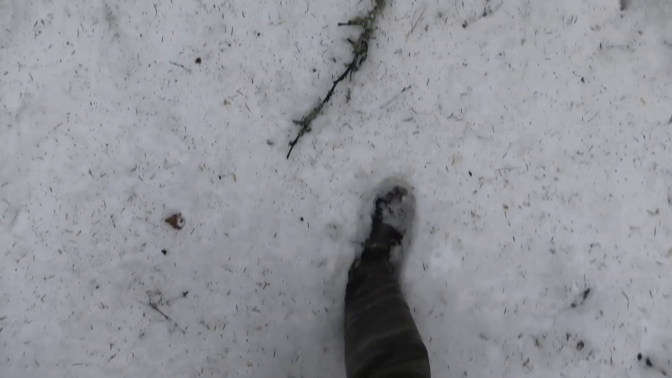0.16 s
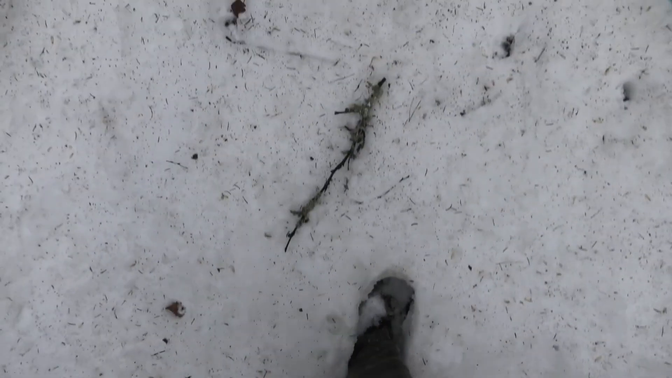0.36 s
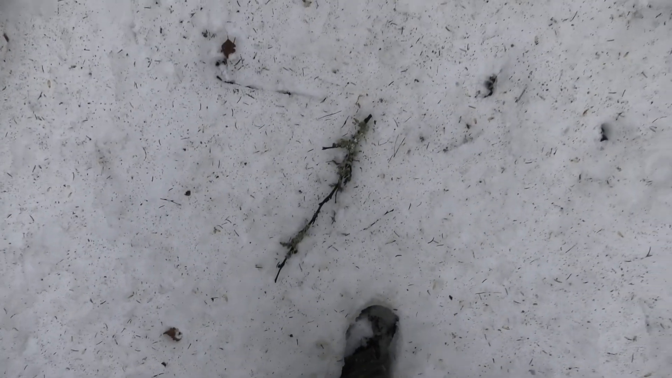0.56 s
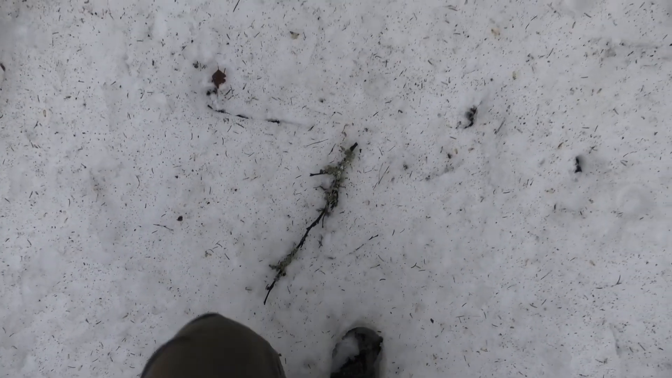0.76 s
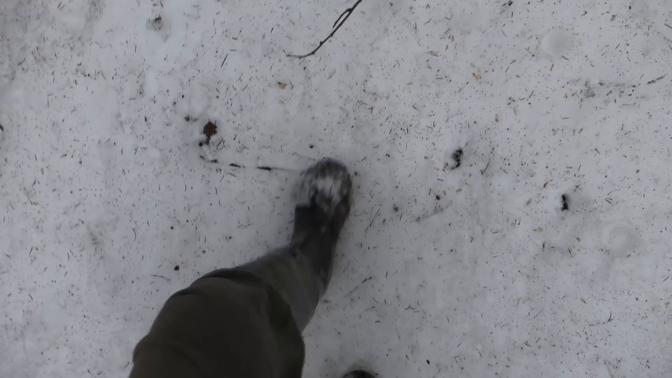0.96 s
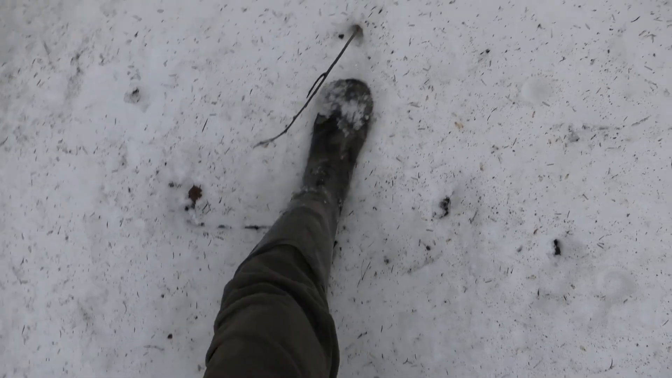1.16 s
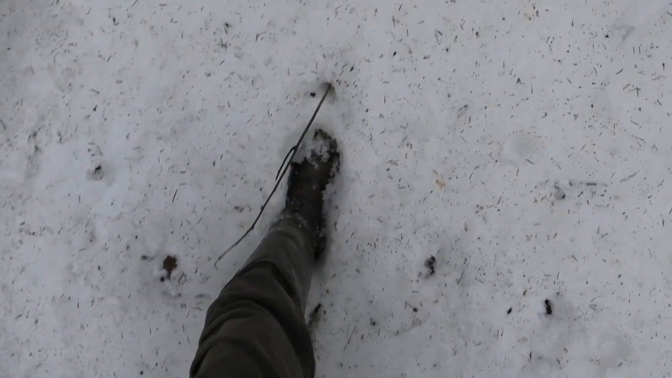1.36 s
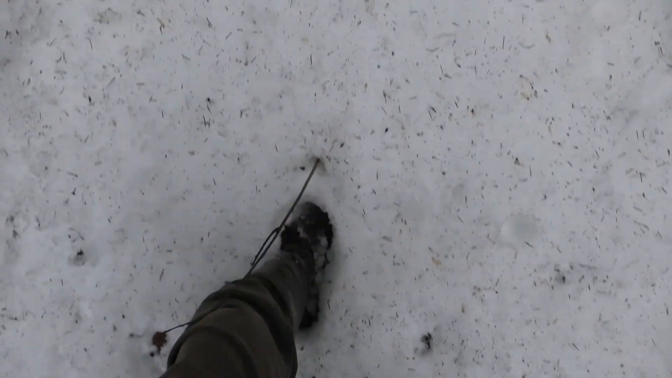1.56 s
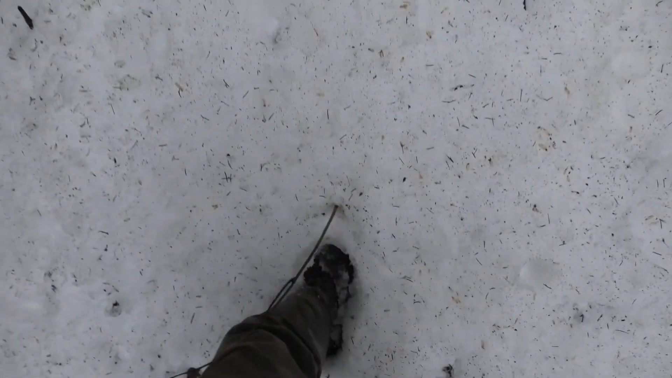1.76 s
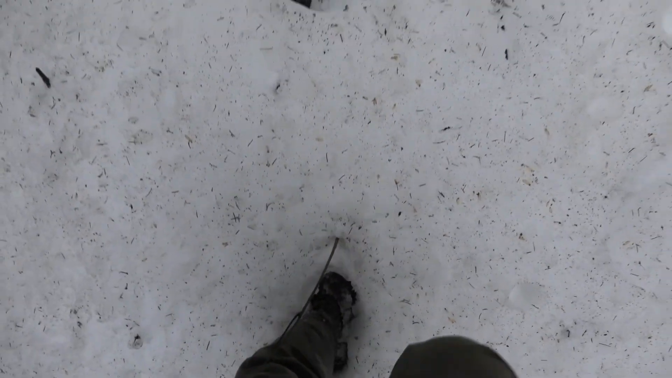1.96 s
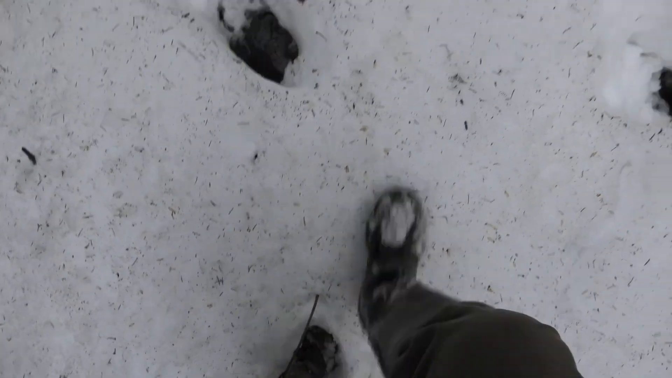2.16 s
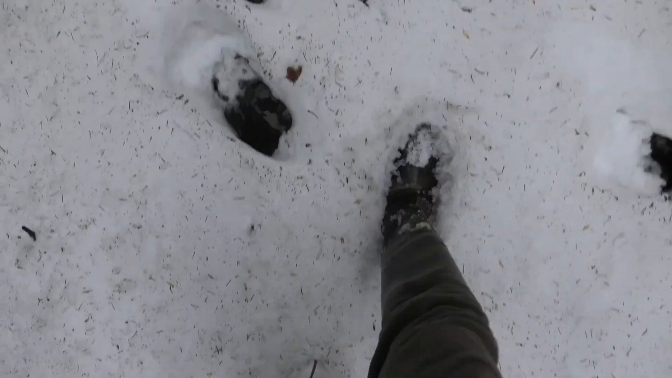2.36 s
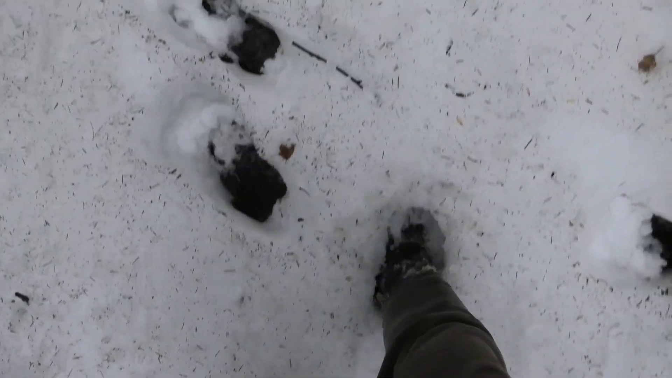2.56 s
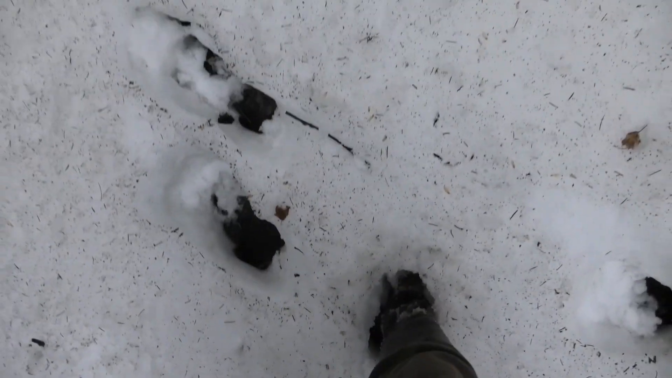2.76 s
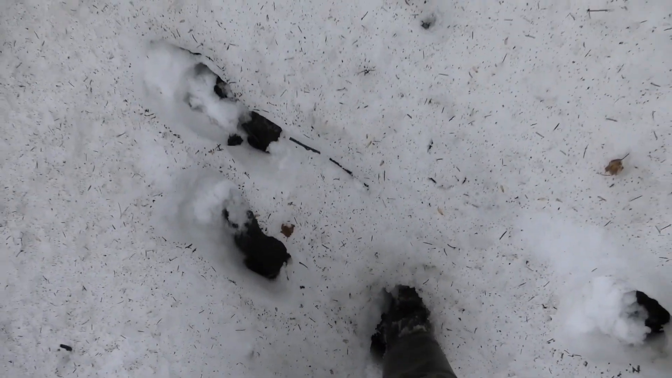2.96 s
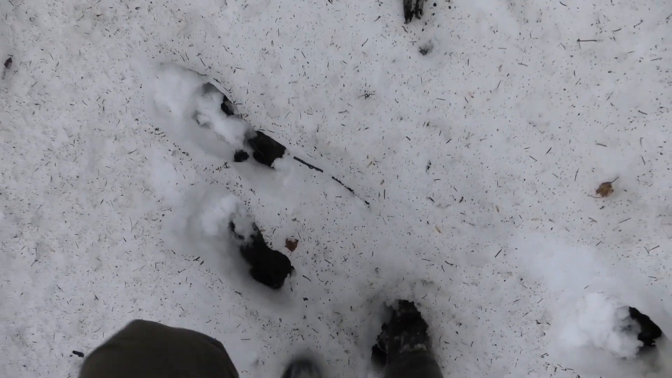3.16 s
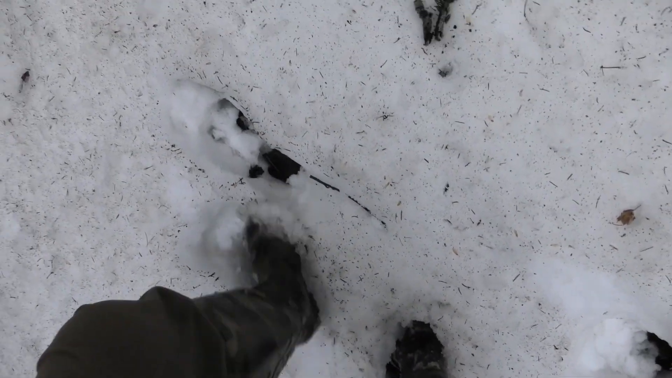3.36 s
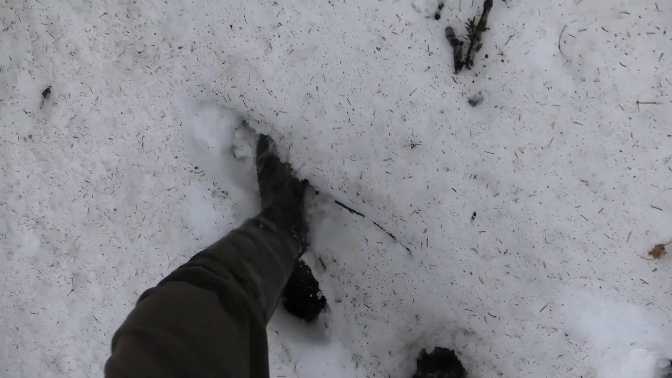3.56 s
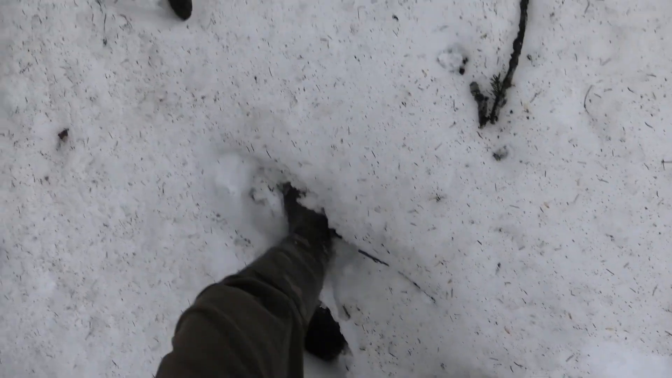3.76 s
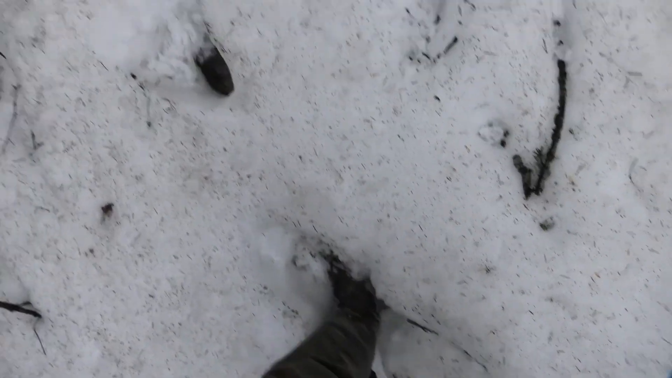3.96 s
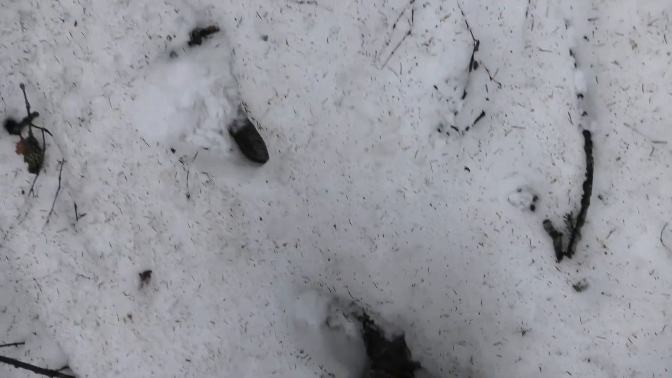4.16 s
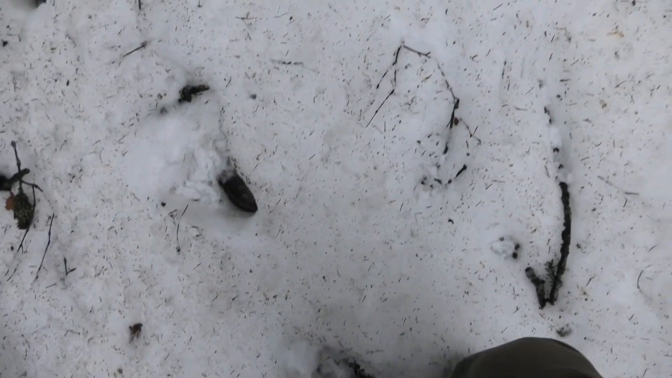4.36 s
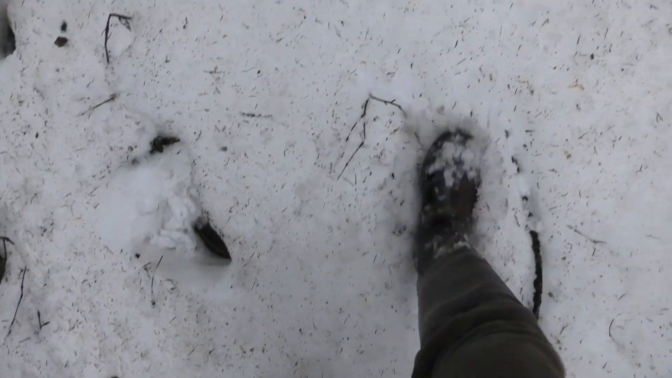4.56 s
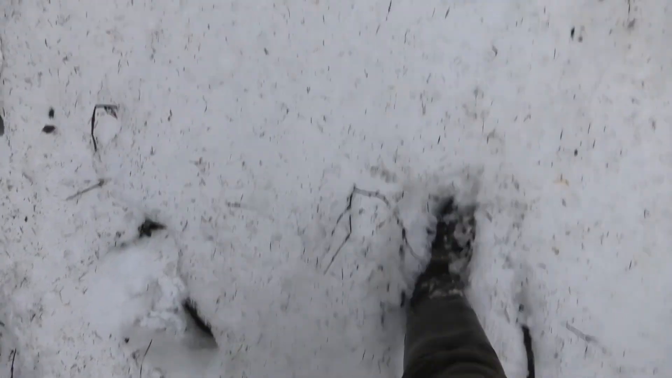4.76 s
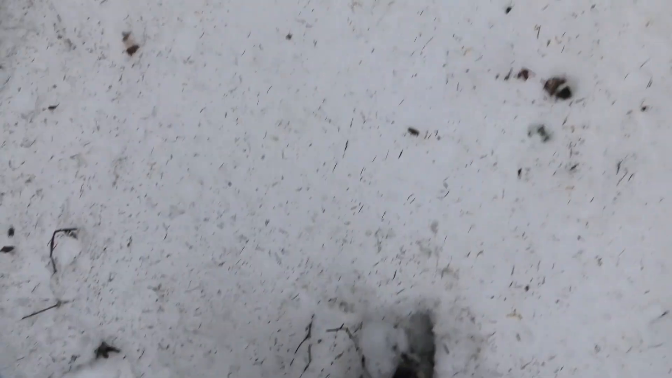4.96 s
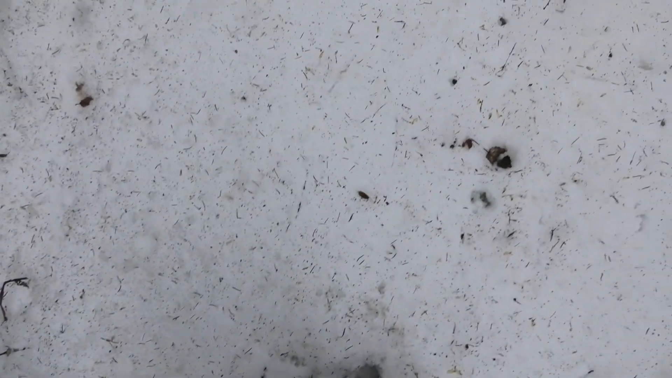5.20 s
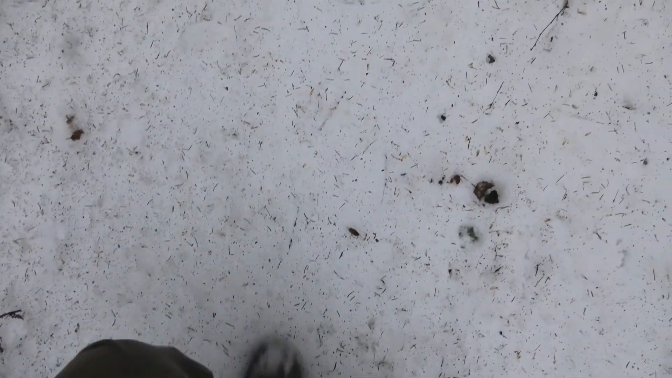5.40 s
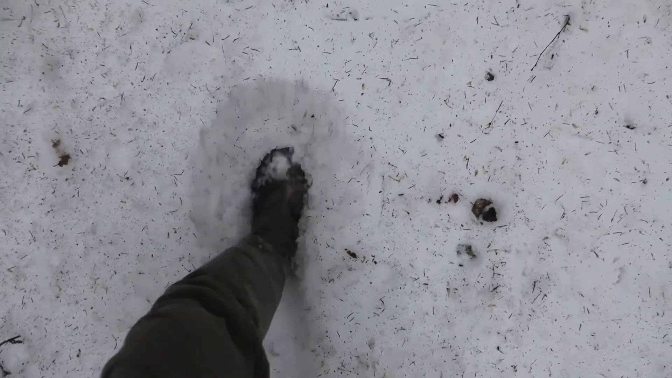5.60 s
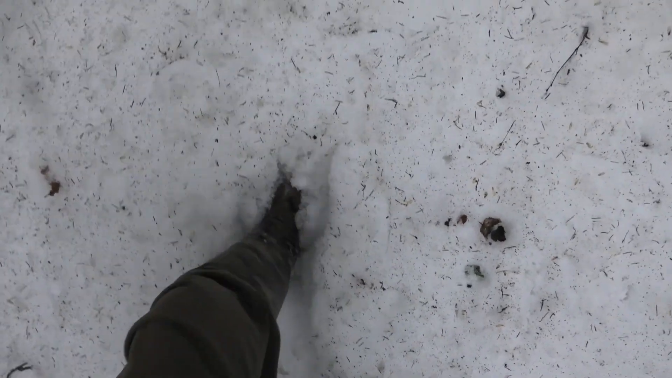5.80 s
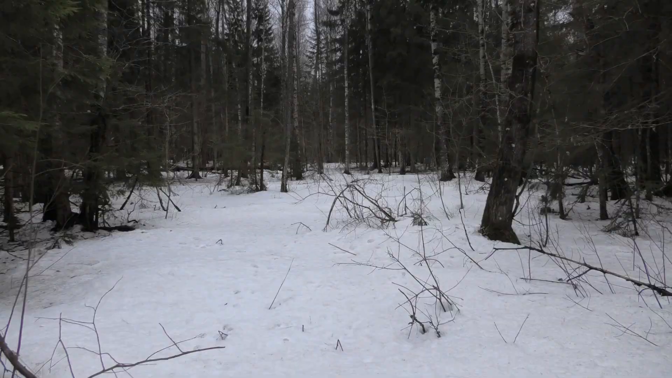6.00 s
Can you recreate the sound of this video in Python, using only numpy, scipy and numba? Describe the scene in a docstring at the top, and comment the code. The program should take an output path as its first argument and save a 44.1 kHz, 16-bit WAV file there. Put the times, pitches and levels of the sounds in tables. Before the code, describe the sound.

One person walks steadily through old, icy snow in a quiet forest. About once a second a boot cracks the crust, grinds coarse grains and presses them into a lower, squeaky-dry crunch, then the toe scrapes out. Tiny twig snaps, soft settling thumps and faint cloth rustle fill the gaps. Heard close from chest height, dry and outdoors, with wide crisp treble.

```python
"""A boot crunches down first: steady walking through old, crusted snow in a still forest follows.
Each step shatters the icy crust, grinds the coarse grains and packs them with a low crunch;
then the heel lifts and the toe scrapes out. The crunch is made of countless random snaps, shaped into layers.
Bursts of noise crack the crust, short knocks are twigs and crumbs, soft low cycles are the settling pack.
Rustling clothes and faint forest air lie around it, all heard through a camera held at chest height."""
import sys
import numpy as np
from scipy import signal
from scipy.fft import rfft, irfft, next_fast_len
from scipy.io import wavfile
from scipy.ndimage import uniform_filter1d, map_coordinates
from numba import njit

SR = 44100
rng = np.random.default_rng(int(sys.argv[2]) if len(sys.argv) > 2 else 0)


def wav_record(signal):
    """Record a signal, one row per channel, as 16-bit PCM in the file named by sys.argv[1]."""
    frames = np.transpose(np.atleast_2d(signal))
    bounded = np.clip(frames, -1, 1)
    # unit amplitude maps onto the largest positive 16-bit level
    quanta = np.round(bounded * 32767).astype(np.int16)
    wavfile.write(sys.argv[1], SR, quanta)


N = 266143
TIME = np.arange(N) / SR  # seconds


def amp(db):
    """Decibels to gain."""
    return 10 ** (np.asarray(db) / 20)


def unit(x):
    """Scale to rms 1."""
    return x / np.sqrt(np.mean(x ** 2) + 1e-20)


def noise(length):
    """White noise for two channels."""
    return rng.standard_normal((2, length))


def curves(rows):
    """One value per sample for each column after the time."""
    s, *columns = np.transpose(rows)
    return [np.interp(TIME, s, column) for column in columns]


def wobble(rate):
    """A smooth random curve with rate knots a second."""
    knots = rng.standard_normal(int(N * rate / SR) + 4)
    return map_coordinates(knots, [TIME * rate])


def filtered(x, response):
    """Multiply the spectrum of x by a response of frequency."""
    m = next_fast_len(N + SR // 2)
    return irfft(rfft(x, m) * response(np.fft.rfftfreq(m, 1 / SR)), m)[..., :N]


def coloured(x, spectrum):
    """Shape x by (Hz, dB) points, joined on a log frequency axis."""
    f, db = np.transpose(spectrum)
    return filtered(x, lambda hz: amp(np.interp(np.log(hz + 1), np.log(f), db)))


@njit
def resonate(x, step, damping):
    """A two-pole resonance, like a damped spring, that follows step = tan(pi f / SR) sample by sample."""
    y = np.zeros_like(x)
    for c in range(x.shape[0]):
        speed = place = 0.0
        for i in range(x.shape[1]):
            g = step[i]
            v = (speed + g * (x[c, i] - place)) / (1 + g * (g + damping))
            speed = 2 * v - speed
            place += 2 * g * v
            y[c, i] = v / np.sqrt(g)
    return y


def ringing(x, hz, damping):
    """Pass x through a fixed or moving resonance and scale it to rms 1."""
    step = np.tan(np.pi * hz / SR) * np.ones(x.shape[1])
    return unit(resonate(np.ascontiguousarray(x), step, damping))


def fractures(level_db, rate, clump_db):
    """Mid and side streams of tiny snaps: more load breaks more bonds, and they go in avalanches."""
    # rate is snaps a second at full load, limited to one per sample
    load = amp(level_db - level_db.max()) ** .7
    chance = np.clip(rate / SR * load, 1e-4, 1)
    # rarer snaps are made stronger, so the average power stays even
    snaps = (rng.random(N) < chance) * noise(N) / np.sqrt(chance)
    clumps = wobble(260) + 0.41 * wobble(60)
    return unit(snaps * amp(clump_db * clumps))


def patchy(x, depth_db):
    """The sound favours now these frequencies, now those, as in the shifting hollow around the boot."""
    z = signal.stft(x, nperseg=512)[2]
    smoothing = np.outer(np.hanning(7), np.hanning(19))  # over frequency, over time
    field = signal.fftconvolve(rng.standard_normal(z.shape[1:]), smoothing, "same")
    return unit(signal.istft(z * amp(depth_db * unit(field)), nperseg=512)[1][:, :N])


def swell(t, start, length, attack_s, release_s):
    """A gain that rises around start, holds for length and dies away, with soft corners."""
    rise = np.logaddexp(0, (start - t) / attack_s)
    fall = np.logaddexp(0, (t - start - length) / release_s)
    return np.exp(-rise - fall)


# Strokes of a boot on the snow. Each row: start in seconds, length in seconds, basic level in dB,
# extra weight on the sole in dB, extra crust in dB, starting pitch of the packing snow in Hz.
# The boot lands and sinks through the crust.
LANDING_STROKES = [(-.02, 0.23, -25, -2.5, -1, 1370), (1.187, 0.24, -26, 1.5, 0.27, 1430),
                   (2.27, 0.18, -24.5, -1.5, 1.1, 1380), (3.39, 0.3, -27.5, 2, -0.86, 1520),
                   (4.535, 0.27, -28.5, -5.5, -0.64, 1420), (5.54, 0.22, -26, -4, 0.07, 1340)]
# The weight rolls on to the ball of the foot and packs the snow; same columns.
PRESS_STROKES = [(.19, 0.086, -23.5, -2.5, -1, 1500), (.275, 0.16, -41.5, 4.5, 5.5, 960),
                 (.425, 0.076, -40.5, 9, 1, 940), (.51, 0.062, -33.5, 5.5, 2, 1011),
                 (1.438, 0.047, -21.5, 5, 1.5, 1090), (1.51, 0.16, -39, 3.5, 7, 1250),
                 (2.395, 0.085, -23, -2, -19, 1052), (2.55, .054, -26.5, 1.5, 1.5, 1100),
                 (2.605, 0.059, -24, -0.5, 2, 1220), (3.685, 0.078, -20.5, 0, 2, 1160),
                 (3.75, 0.069, -25.5, -2.5, 5, 1240), (3.8, 0.098, -36, -5, 4, 1290),
                 (3.915, .07, -29.5, -4, 2, 1240), (3.99, 0.081, -31, -1, -6, 1210),
                 (4.702, 0.092, -23.5, -0.5, -7, 1110), (4.79, 0.14, -35.5, -2.5, 7, 1340),
                 (4.9, 0.049, -27.5, -0.5, 2, 1310), (5.66, 0.11, -30, 2.5, 7, 1190),
                 (5.825, 0.053, -39.5, 7, 8.5, 1060), (5.915, 0.016, -40, 1, 2.5, 1300),
                 (6.005, 0.047, -38, 2.5, 0, 1230)]
# The foot pushes off: the sole twists in its print and the toe scrapes out; same columns.
PUSH_STROKES = [(.53, 0.062, -40.5, 4, 3, 1110), (1.385, 0.059, -25, -16, -5.5, 1500),
                (1.685, 0.064, -32, 0.5, -2.5, 1430), (1.75, 0.039, -30.5, 3.5, -4, 1400),
                (1.79, 0.084, -26.5, -4, -5, 1800), (2.7, .2, -42.5, 4.5, 1, 1050),
                (2.62, 0.074, -35.5, -5.5, -2, 1300), (2.8, 0.024, -36, 6, 0.5, 1000),
                (2.905, 0.091, -34, 2.5, -0.5, 1030), (2.99, 0.036, -42, 0, 6, 1200),
                (3.04, .088, -41, -8.5, 4.5, 1690), (3.148, 0.031, -41, -14, -2, 1860),
                (4.06, 0.085, -41.5, -2, -8, 1260), (4.172, .03, -31, -11, -5, 1560),
                (4.995, 0.042, -32, -1.5, -2, 1300), (5.035, 0.031, -36.5, -2.5, -1, 1300),
                (5.06, 0.14, -44, 3.5, 3, 1430), (5.72, 0.038, -30.5, -4, 6, 1300)]
# The heel skims and strikes the crust; same columns.
SKIM_STROKES = [(1.104, 0.11, -32, 9, -1.5, 1200), (2.21, 0.028, -33.5, 0, 3.5, 1480),
                (2.246, 0.032, -23.5, -1, 3, 1260), (2.48, .05, -47, 0, 5.5, 1100),
                (3.208, 0.032, -42.5, -4, 7.5, 1420), (3.242, 0.064, -31.5, 0, 3.5, 1460),
                (3.348, 0.062, -29, 1, 3.5, 1850), (4.428, 0.1, -42, -0.5, 4.5, 1500),
                (4.522, 0.066, -32, 1.5, 8.5, 1400), (5.398, 0.034, -54, -2.5, 6, 1300),
                (5.438, 0.022, -39.5, 4, 9.5, 1650), (5.458, 0.13, -32, -7.5, 3, 1660)]
# How each kind loads the snow: sole, packing, grinding and crust in dB, added to the basic level.
SKIM_LOAD, LANDING_LOAD = (-15.5, 0, 3.5, 0.5), (-13, -0.5, 0, -2)
PRESS_LOAD, PUSH_LOAD = (-12.5, 0.5, -4.5, -13.5), (-11, -2, -0.5, -7)
# Softness of the attack in seconds, softness of the release in seconds, basic pitch of the grains in Hz.
SKIM_SHAPE, LANDING_SHAPE = (0.0073, 0.014, 3820), (.008, .018, 3420)
PRESS_SHAPE, PUSH_SHAPE = (0.0081, .014, 3040), (0.011, .008, 3100)
SINK_DB = (3, 1, 0, -2.5)  # change of the four layers over a landing, as the crust is used up
PACKING_HZ, CRUST_HZ = 1370, 8750  # usual pitch of packing snow; starting pitch of shattering crust
SAG_OCTAVES_PER_S = 0.28  # every pitch sinks as the boot goes deeper
PITCH_COUPLING = 0.14  # exponent: the grains grind higher in snow that packs higher
TRICKLE_DB, TRICKLE_S = -19, .06  # gain and fade of loose grains that settle after each stroke


def strokes():
    """Levels (dB) of four snow layers, pitches (Hz) of the upper three; the strongest stroke rules the pitch."""
    t = TIME[::64]
    power, pitch = np.zeros((4, len(t))), np.zeros((3, len(t)))
    kinds = [(SKIM_STROKES, SKIM_LOAD, SKIM_SHAPE, False),
             (LANDING_STROKES, LANDING_LOAD, LANDING_SHAPE, True),
             (PRESS_STROKES, PRESS_LOAD, PRESS_SHAPE, False),
             (PUSH_STROKES, PUSH_LOAD, PUSH_SHAPE, False)]
    for rows, load, (attack_s, release_s, grinding_hz), sinks in kinds:
        for start, length, db, sole_db, crust_db, packing_hz in rows:
            age = np.clip(t - start, 0, length)
            layer_db = db + np.add(load, [sole_db, 0, 0, crust_db])[:, None]
            layer_db = layer_db + sinks * np.outer(SINK_DB, age / length)
            tread = swell(t, start, length, attack_s, release_s)
            trickle = amp(TRICKLE_DB) * swell(t, start + length, 0, attack_s, TRICKLE_S)
            stroke = amp(layer_db) ** 2 * (tread ** 2 + trickle ** 2) + 1e-12
            grains_hz = grinding_hz * (packing_hz / PACKING_HZ) ** PITCH_COUPLING
            sag = 2 ** (-SAG_OCTAVES_PER_S * age)
            power += stroke
            pitch += stroke[1:] * np.outer([packing_hz, grains_hz, CRUST_HZ], sag)
    level_db = 10 * np.log10(power.T)
    mean_pitch = (pitch / power[1:]).T  # average weighted by power
    return curves(np.c_[t, level_db, mean_pitch])


# Tone of each snow layer. Each row: frequency in Hz, relative gain in dB.
SOLE_TONE = [(25, -42), (60, -31), (100, -22), (150, -8.5), (220, -1.5), (330, 1.5), (480, 4.5), (650, 1),
             (1000, -9), (2500, -52)]
PACKING_TONE = [(200, -42), (420, -7.5), (620, -0.5), (1000, -1.5), (1600, -1.5), (2100, -3), (2700, -9.5),
                (4500, -5), (9000, -60)]
GRINDING_TONE = [(900, -50), (1800, 2), (2400, -1), (2950, -3.5), (3600, -2.5), (5200, -2), (6100, 1),
                 (6700, -1.5), (8000, -5), (14000, -40)]
# Coarse crystals that snap now and then and stand out of the crunch; same columns.
CRYSTAL_TONE = [(300, -23), (900, -2), (1800, -0.5), (3500, -1.5), (6000, -6), (11000, -12), (15500, -18)]
# Thin ice on top; same columns.
CRUST_TONE = [(3000, -2), (5800, -1), (6700, -0.5), (7300, -1.5), (8800, -3), (9900, -5.5), (11000, -2),
              (12300, -3.5), (13300, -5.5), (14600, 1.5), (15800, -5)]
CRYSTAL_DB = -12.5  # against the grinding


def footsteps():
    """The boot sinks through crust and coarse grains until the packed snow carries it."""
    weight_db, packing_db, grinding_db, crust_db, packing_hz, grinding_hz, crust_hz = strokes()
    # the sole and the pack under it take the collapse as a dull rumble
    sole = unit(coloured(fractures(weight_db, rate=6000, clump_db=1.5), SOLE_TONE))
    # clumps slip and lock in a broad, moving resonance
    slips = ringing(fractures(packing_db, rate=9000, clump_db=0.2), packing_hz, damping=0.76)
    packing = patchy(coloured(slips, PACKING_TONE), depth_db=1.25)
    # single grains rub on each other and on the tread
    rubs = ringing(fractures(grinding_db, rate=26000, clump_db=-0.28), grinding_hz, damping=0.61)
    grinding = patchy(coloured(rubs, GRINDING_TONE), depth_db=2.0)
    crystals = unit(coloured(fractures(grinding_db, rate=350, clump_db=1.5), CRYSTAL_TONE))
    grinding = grinding + amp(CRYSTAL_DB) * crystals
    # thin ice on top shatters into a fine fizz
    shards = ringing(fractures(crust_db, rate=60000, clump_db=0.8), crust_hz, damping=0.83)
    crust = patchy(coloured(shards, CRUST_TONE), depth_db=0.5)
    low = amp(weight_db + 2) * sole + amp(packing_db) * packing
    return low + amp(grinding_db) * grinding + amp(crust_db) * crust


# A leg swings through. Each row: start in seconds, length in seconds, level in dB.
LEG_SWINGS = [(0.632, .3, -44), (1.967, 0.16, -40.5), (2.07, 0.11, -39.5), (3.14, .07, -49),
              (4.232, .11, -49), (4.341, .12, -41.5), (5.32, 0.13, -42.5), (5.84, 0.16, -42)]
# Tone of the cloth. Each row: frequency in Hz, relative gain in dB.
CLOTH_TONE = [(24, -81), (40, -49), (294, -15), (417, -5.5), (859, -6.5), (1730, -8.5), (1910, -12),
              (2060, -9.5), (5300, -17.5), (15500, -36)]
SWING_ATTACK_S, SWING_RELEASE_S = 0.019, 0.012
RUSTLE_DB = -55  # the clothes between swings


def clothes():
    """Trouser legs and coat rub in countless small catches, most while a leg swings through."""
    swings = [amp(db) * swell(TIME, start, length, SWING_ATTACK_S, SWING_RELEASE_S)
              for start, length, db in LEG_SWINGS]
    level_db = 10 * np.log10(amp(RUSTLE_DB) ** 2 + np.sum(np.square(swings), axis=0))
    catches = fractures(level_db, rate=16000, clump_db=1.8)
    return amp(level_db) * patchy(coloured(catches, CLOTH_TONE), depth_db=1.0)


# Tone of the air. Each row: frequency in Hz, relative gain in dB.
FOREST_TONE = [(25, -28), (90, -25), (200, -4), (420, 1.5), (900, 0.5), (2200, -2.5), (5700, -9),
               (15500, -25)]


def forest():
    """Faint, even air among the trees, made of shaped noise."""
    return amp(-47.0) * unit(coloured(noise(N), FOREST_TONE))


# Twigs and crumbs of ice. Each row: start in seconds, level in dB before the tone below, pitch in Hz,
# brightness (strength of the crack) in dB before a fixed small lift.
TWIGS_AND_CRUMBS = [(0.341, -26, 795, -18.5), (0.5105, -17.5, 870, -17.5), (0.6712, -26.5, 1510, -28.5),
                    (0.695, -28, 1800, -2), (0.715, -29.5, 1300, -11), (0.9816, -32.5, 1500, -3),
                    (1.056, -28, 1550, -3), (1.542, -30, 990, -15), (1.675, -24.5, 900, -17),
                    (1.952, -29, 1440, -24), (1.962, -25.5, 1450, -19), (2.1678, -29, 1440, -2),
                    (3.0938, -22.5, 1920, -24), (3.9286, -23, 955, -15), (3.9817, -15.5, 1410, -20.5),
                    (5.154, -26, 1620, -24), (5.295, -35, 1500, -21), (5.327, -33, 1730, -17),
                    (5.333, -31.5, 2300, -26.5)]
# Tone of a light twig or crumb. Each row: frequency in Hz, gain in dB.
KNOCK_TONE = [(40, -30), (150, -1), (400, 2.5), (9000, -4.5), (15000, -24)]


def ticks():
    """Twigs snap and crumbs land: a sharp crack, a short knock and a scatter of tiny grains."""
    out, t = np.zeros((2, N)), TIME[:SR // 16]
    for s, db, hz, bright_db in TWIGS_AND_CRUMBS:
        # each part fades by 60 dB in the seconds given
        crack = noise(len(t)) * amp(-60 * t / 0.019)
        knock = np.sin(2 * np.pi * hz * t) * amp(-60 * t / .008)
        scatter = ringing(noise(len(t)), hz, damping=.6) * amp(-60 * t / .028)
        tick = 0.89 * knock + 0.55 * scatter + amp(bright_db + 0.5) * crack
        out[:, round(s * SR):][:, :len(t)] += amp(db) * tick
    return coloured(out, KNOCK_TONE)


# Plates of crust giving way at once. Each row: start in seconds, length in seconds before the fade,
# level in dB before a fixed trim, pitch in Hz.
CRUST_BREAKS = [(0.444, 0.036, -37, 900), (1.1, 0.012, -28.5, 7450), (1.189, 0.068, -23, 770),
                (1.485, 0.036, -26.5, 950), (2.538, 0.013, -28, 1160), (2.796, 0.029, -31.5, 1270),
                (3.273, 0.0077, -18.5, 4400), (3.688, 0.03, -36, 1200), (5.466, 0.014, -17.5, 4400),
                (5.549, 0.03, -20, 1110), (5.849, 0.017, -29, 1020)]


def breaks():
    """A plate of crust caves in: a short, dense burst of cracks, made of ringing noise."""
    out, t = np.zeros((2, N)), TIME[:SR // 10]
    for s, length, db, hz in CRUST_BREAKS:
        fade = amp(-60 * np.maximum(t - length, 0) / 0.0066)
        shape = (1 - np.exp(-t / 0.0013)) * fade
        burst = ringing(noise(len(t)), hz, damping=0.93)
        out[:, round(s * SR):][:, :len(t)] += amp(db - 2.5) * shape * burst
    return coloured(out, [(60, -14), (220, 0)])  # less bass


# Heel and ball of the foot settle. Each row: start in seconds, level in dB before a fixed lift, pitch in Hz.
SETTLING_THUMPS = [(0.471, -37.5, 191), (1.185, -39, 301.5), (1.768, -39, 255), (2.541, -40, 230),
                   (2.97, -42, 180.3), (3.68, -35, 280), (4.534, -43.5, 236), (4.745, -49, 230),
                   (4.912, -37, 280), (5.093, -41, 205), (5.549, -42, 276)]


def thumps():
    """The pack settles under the body's weight with a few soft, low cycles."""
    out, t = np.zeros(N), TIME[:SR // 8]
    shape = (1 - np.exp(-t / 0.0031)) ** 2 * amp(-60 * t / 0.032)
    for s, db, hz in SETTLING_THUMPS:
        push = np.sin(2 * np.pi * hz * t) * shape
        out[round(s * SR):][:len(t)] += amp(db + 17.0) * push
    return out


# The boot or trouser leg slides over the snow. Each row: start in seconds, end in seconds,
# level in dB before a fixed trim, lowest frequency in Hz, highest frequency in Hz.
SNOW_SCUFFS = [(0.508, 0.6, -31.5, 2100, 3590), (1.799, 1.882, -25.5, 2500, 3520),
               (1.796, 1.89, -36, 3800, 7000), (2.799, 2.83, -34.5, 3460, 6540),
               (2.892, 2.996, -33.5, 3560, 6670), (3.039, 3.148, -36, 3450, 6660),
               (3.989, 4.246, -39.5, 6240, 8320), (4.406, 4.568, -38, 11700, 15000),
               (4.97, 5.013, -34, 2250, 6140), (5.102, 5.214, -51.5, 2460, 6060)]


def scuffs():
    """Sliding over the grains gives a short rasp: noise in one band."""
    out = np.zeros((2, N))
    for start, end, db, low_hz, high_hz in SNOW_SCUFFS:
        stroke = signal.windows.tukey(round((end - start) * SR), .45)
        band = signal.butter(5, [low_hz, high_hz], "bandpass", fs=SR, output="sos")
        rasp = unit(signal.sosfilt(band, noise(len(stroke))))
        out[:, round(start * SR):][:, :len(stroke)] += amp(db - 3.5) * stroke * rasp
    return out


def during(spans):
    """1 inside the spans, 0 outside, with soft edges."""
    inside = sum((TIME >= start) & (TIME < end) for start, end in spans)
    return uniform_filter1d(inside.astype(float), size=SR // 50)


BALANCE_FROM_HZ = 7000


def left_and_right(pair, place):
    """Left and right from mid and side: each place has its own tone and its own width at each frequency."""
    hz, colour_db, side_db, balance_db = np.transpose(place)
    mid = coloured(pair[0], np.c_[hz, colour_db])
    side = coloured(pair[1], np.c_[hz, colour_db + side_db])
    # only the treble leans left or right
    lean_db = balance_db * (hz > BALANCE_FROM_HZ) / 2
    left = coloured(mid + side, np.c_[hz, lean_db])
    right = coloured(mid - side, np.c_[hz, -lean_db])
    return np.array([left, right])


# When each boot treads in front of the body; at other times the boots are under or behind it.
# Each row: start in seconds, end in seconds.
RIGHT_BOOT_AHEAD = [(-.1, .3), (2.19, 2.51), (4.4, 4.82)]
LEFT_BOOT_AHEAD = [(1.08, 1.52), (3.2, 3.87), (5.42, 5.8)]
# Tone and stereo width of each place; the sound is nearly mono in the low mids and wide in the treble. Each
# row: frequency in Hz, colour in dB, side against mid in dB, left minus right in dB (used only above
# BALANCE_FROM_HZ).
RIGHT_PLACE = [(100, 0.5, -32, 0), (1300, -1, -77, 0), (3400, 0.5, -77, 0), (4230, -2, -57, 0),
               (5100, 3, -21, 0), (6800, -8.5, -5, 0), (7450, 1, -11, -0.5), (9000, -0.5, -4, 5),
               (10100, -1.5, 3, -4), (10950, 3, -6, -7.5), (12000, 0.5, -8, -2), (13400, 1, -11, -1),
               (15000, -0.5, -10, 0)]
LEFT_PLACE = [(100, -0.5, -26, 0), (1300, 0, -78, 0), (3440, 1, -79, 0), (4780, -0.5, -30, 0),
              (5170, -0.5, -12.5, 0), (6350, -6, -5, 0), (6800, -11, -3, 0), (7000, -1, -11, 1),
              (9600, 3, -10, 1), (10700, -1, -5, -8.5), (12500, -4, -2, 1), (14600, -1, -4, 5),
              (15500, -3, -3, 1)]
BEHIND_PLACE = [(100, 2, -29, 0), (400, 3.5, -50, 0), (1310, 0.5, -85, 0), (2400, 2.5, -29, 0),
                (4180, 1.5, -18, 0), (6600, 1, -10, 0), (7550, -2, -2, 3), (9000, 3, -3, 1.5),
                (11000, -1.5, -1, -3), (13000, -1, -3, 0), (14600, -2, -3, 1), (15600, 4, -2, 1)]
AROUND_PLACE = [(30, 0, -10, 0), (110, 0, -20, 0), (400, 0, -24, 0), (1340, 0, -36.5, 0), (2500, 0, -44, 0),
                (4400, 0, -9.5, 0), (7000, 0, -2.5, 0), (9900, 0, 4.5, 0), (15000, 0, -2, 0)]


def scene():
    """Right and left boot land ahead in turn and push off behind; clothes and forest lie all around."""
    crunch = footsteps() + breaks()
    right, left = during(RIGHT_BOOT_AHEAD), during(LEFT_BOOT_AHEAD)
    ahead = left_and_right(crunch * right, RIGHT_PLACE) + left_and_right(crunch * left, LEFT_PLACE)
    behind = left_and_right(crunch * (1 - right - left) + scuffs() + ticks(), BEHIND_PLACE)
    around = left_and_right(clothes() + forest(), AROUND_PLACE)
    return ahead + behind + thumps() + around


def record(dry):
    """The camera thins the deep bass and keeps nothing above its band limit."""
    low_cut_hz, top_hz = 70, 15780
    return filtered(dry, lambda hz: hz / np.hypot(hz, low_cut_hz) * (hz < top_hz))


dry = scene()
out = record(dry)
wav_record(out)
```